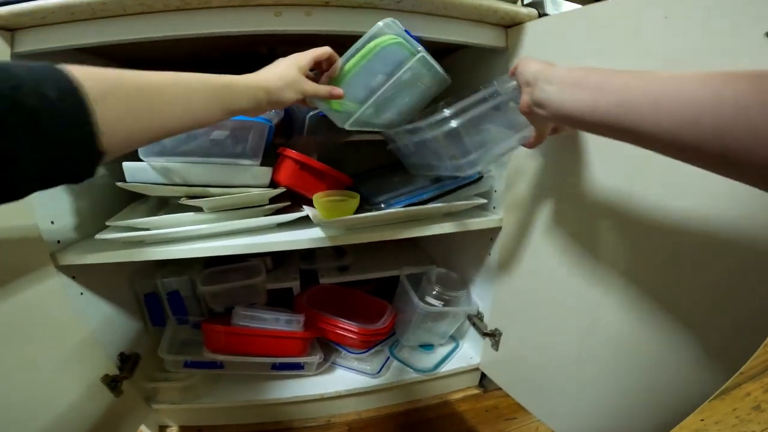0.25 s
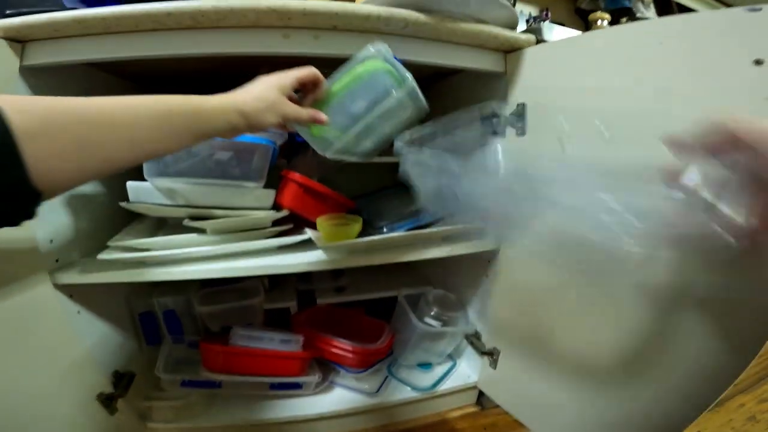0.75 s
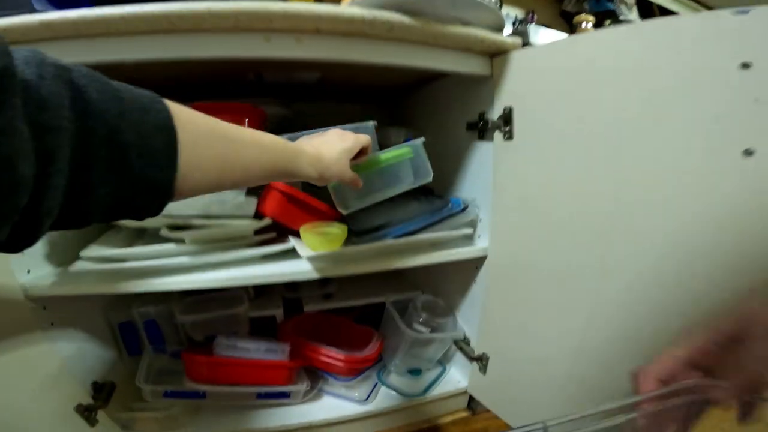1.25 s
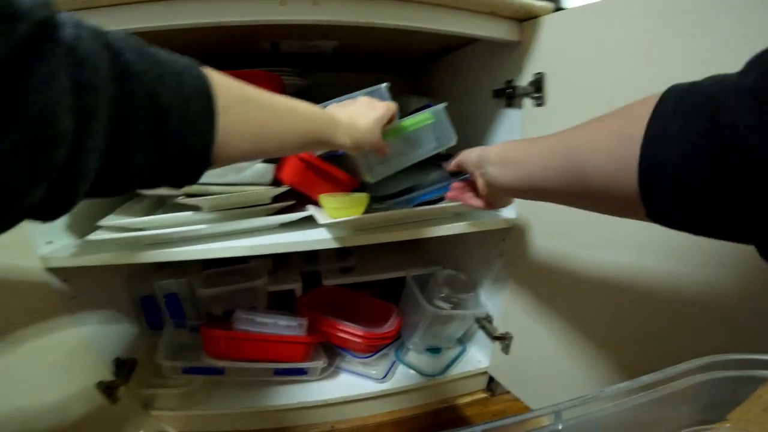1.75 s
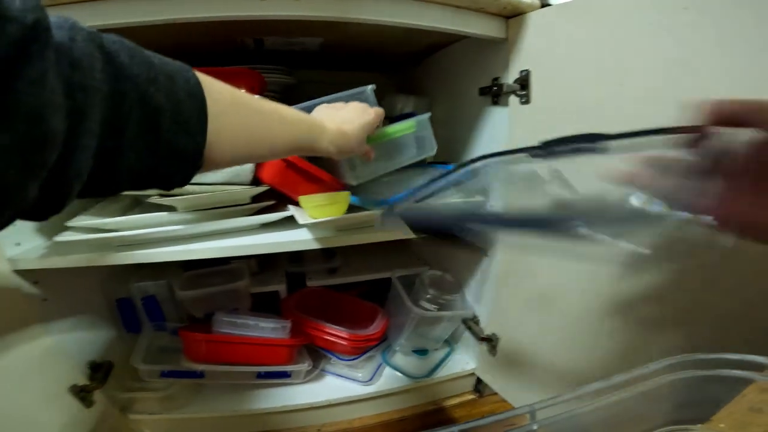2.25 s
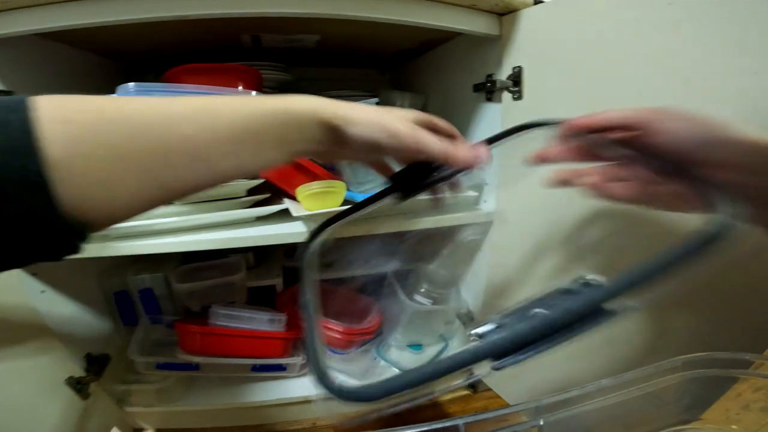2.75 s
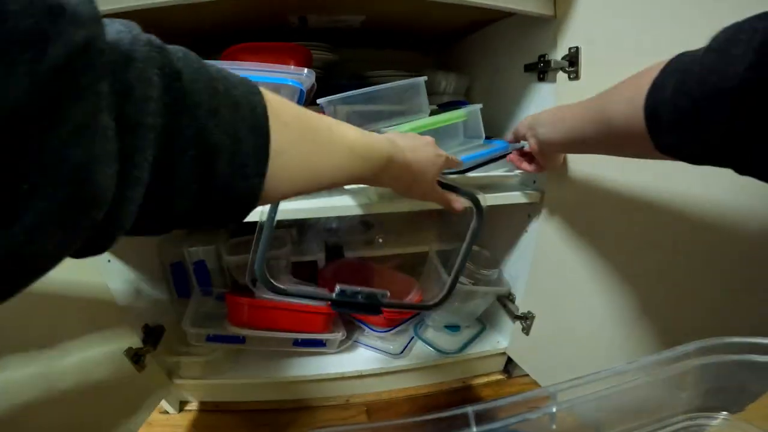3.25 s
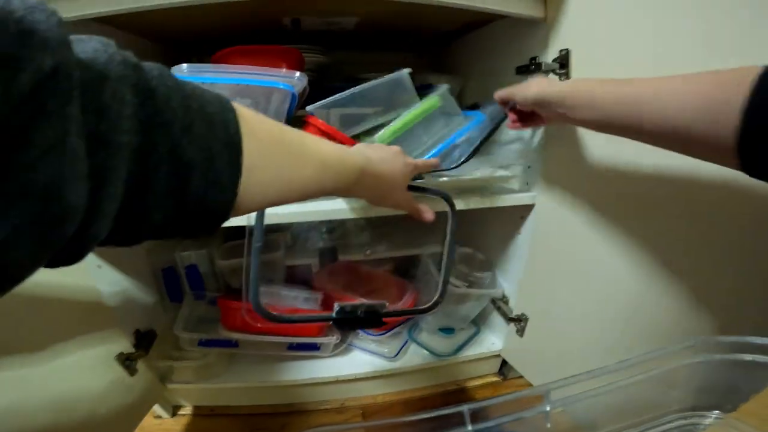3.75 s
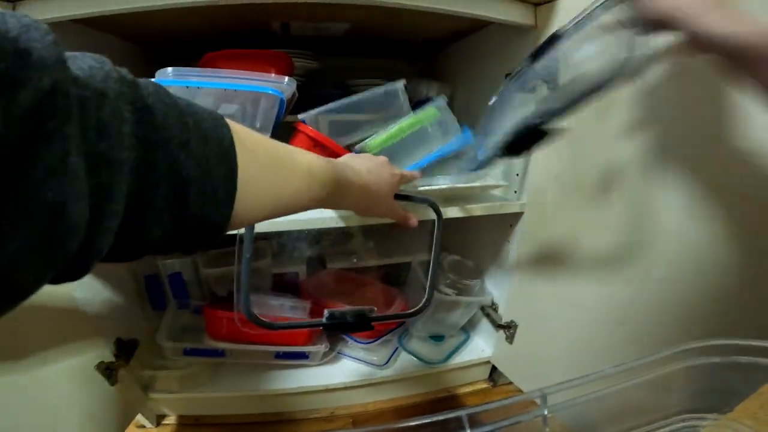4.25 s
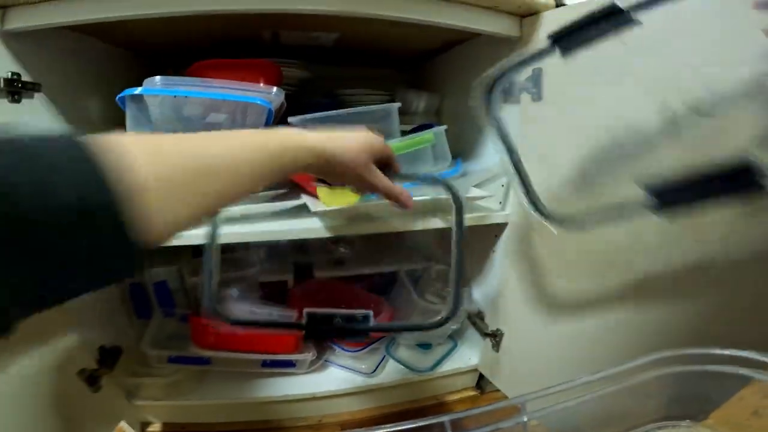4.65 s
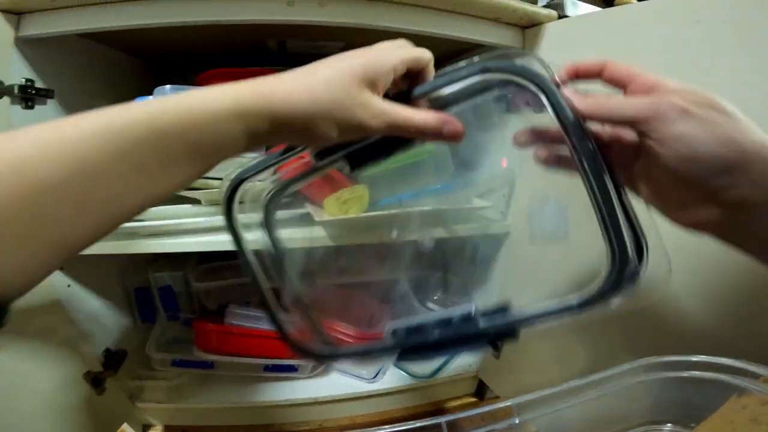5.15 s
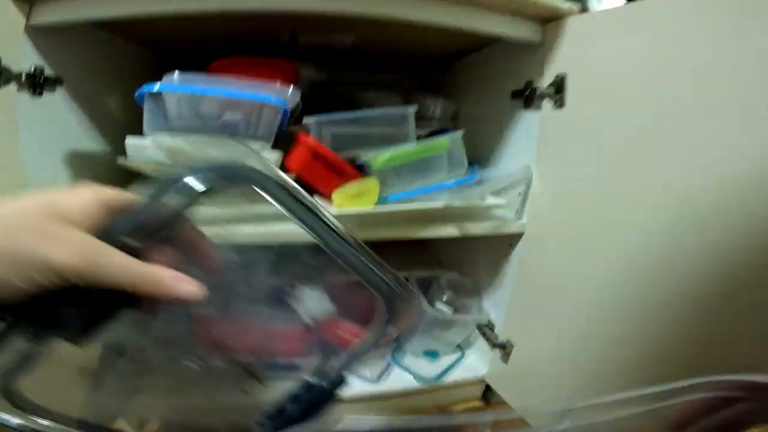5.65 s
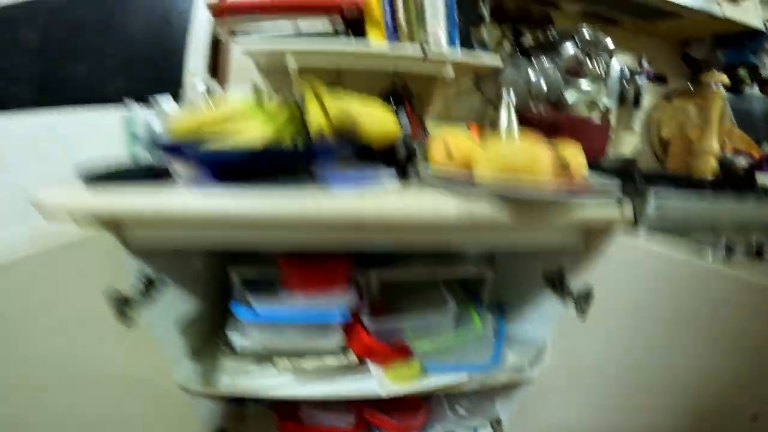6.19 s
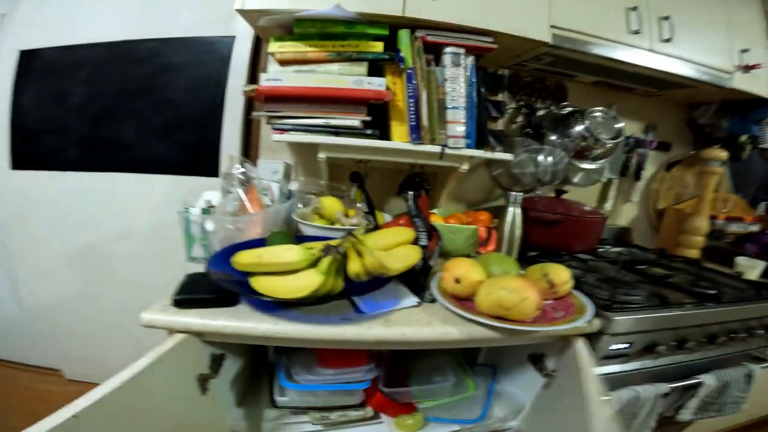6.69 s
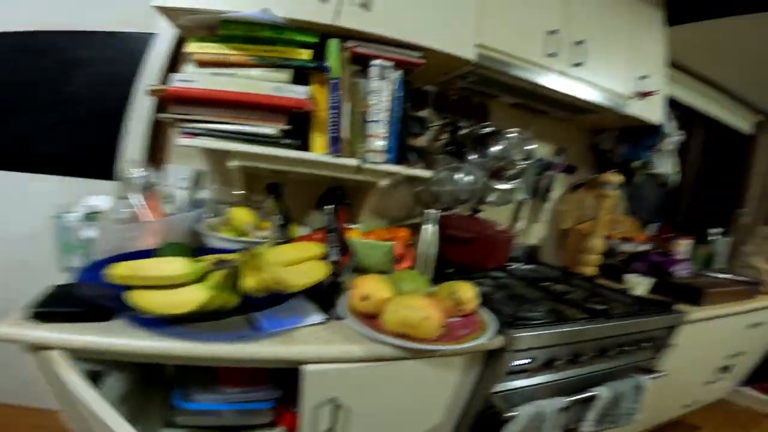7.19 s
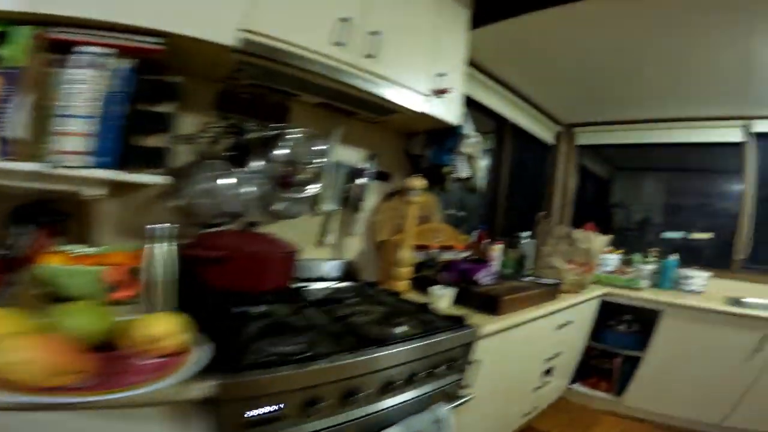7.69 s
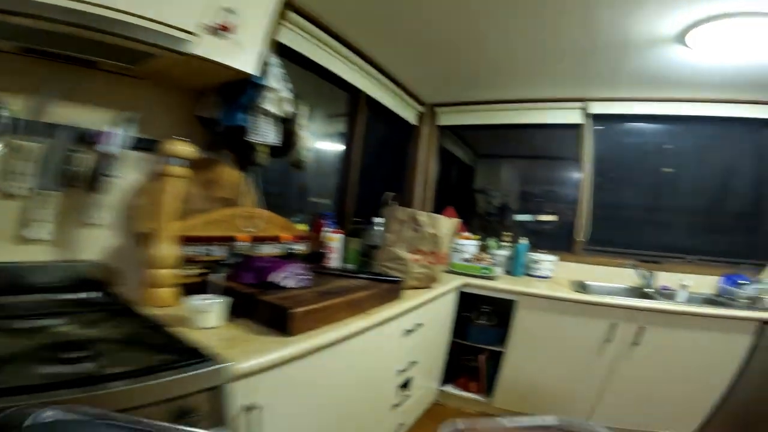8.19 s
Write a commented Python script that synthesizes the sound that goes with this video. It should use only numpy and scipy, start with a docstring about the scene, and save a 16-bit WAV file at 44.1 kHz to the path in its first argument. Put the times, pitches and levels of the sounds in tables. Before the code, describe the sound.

Plastic containers bump and slide against one another in a cupboard, dry and very near, with hollow mid-low notes and occasional bright clicks. Rigid lids catch as they are pulled out, then clack in the hand. A quieter moment of cloth movement follows before several woody door bangs with a short kitchen echo. Faint low room noise and microphone-handling bumps continue throughout.

```python
"""Close to a hand-carried stereo microphone, two people dig through a cupboard of plastic food containers.
From the start, in still kitchen air, tubs knock (noise snaps and rattles through resonances) and slide
(slips and hiss) on a booming shelf; the hand rumbles. Then two stiff lids catch on the way out and clack
together, cloth brushes as the two step back, and the cupboard doors bang shut and fill the small room.
Every touch has a level, a weight (how much it shakes the shelf) and a hardness (how bright it is)."""
import sys
import numpy as np
from scipy import signal
from scipy.fft import rfft, irfft, next_fast_len
from scipy.io import wavfile
from scipy.ndimage import uniform_filter1d

SR = 44100
rng = np.random.default_rng(int(sys.argv[2]) if len(sys.argv) > 2 else 0)


def log_audio(samples):
    """Write samples as a 16-bit WAV file to the path given in sys.argv[1]."""
    # one column per channel
    frames = np.atleast_2d(samples).T
    # limit to full scale, then quantise
    limited = np.clip(frames, -1, 1)
    pcm = np.round(limited * 32767).astype(np.int16)
    wavfile.write(sys.argv[1], SR, pcm)


N = 371763

# Edges of five zones, thud, knock, clack, tick and sparkle: edge_hz
ZONE_EDGES_HZ = [48, 180, 650, 2200, 6000, 15000]
# Steady room noise of the kitchen, relative colour: pitch_hz, level_db (per Hz)
AIR_COLOUR = [(15, -24.5), (25, -8), (58, 5), (133, -3.5), (239, -2), (464, -18.5), (831, -36),
              (1240, -29.5), (2340, -40), (7140, -46), (8600, -50.5), (10600, -50), (12800, -57),
              (14200, -70.5)]
AIR_DB = -42
# Steady tremor of the hand with the microphone, stronger once it walks: time_s, rumble_db
HAND_TREMOR = [(0, -48), (5.6, -52), (6.1, -46), (8.43, -46.5)]
# Jolts to that hand: start_s, length_s, rumble_db
HAND_JOLTS = [(1.075, 0.024, -22.5), (1.272, 0.044, -16), (2.9, .02, -23), (5.154, 0.027, -22),
              (5.443, 0.023, -16), (5.687, .02, -18.5), (5.98, 0.24, -38.5), (6.854, 0.049, -31.5),
              (7.27, .02, -21), (7.45, .02, -35), (7.76, .03, -31.5), (7.997, .15, -38)]
JOLT_RISE_S, JOLT_FALL_S = 0.065, 0.22   # time to swell and to die by 60 dB
# Tubs bumping each other and the shelf: start_s, level_db, weight_db, hardness_db,
# looseness (factor on the length, held to 0.3-3), ring_pitch_hz, hollow_pitch_hz
TUB_BUMPS = [(0.001, -19.5, -25, 1, 0.16, 700, 350), (0.095, -17.5, -22, 2.5, 1, 1010, 350),
             (0.13, -23.5, 6, 11.5, 1, 910, 342), (0.18, -38.5, 24.5, -2, .5, 956, 318),
             (0.234, -22, 12, -13, 0.92, 640, 303), (0.435, -33, -13, -6, 0.82, 1010, 471),
             (0.515, -25, -16, 2, 1, 1010, 312), (0.541, -16, -13, 8.5, 0.28, 764, 417),
             (0.599, -19.5, -8, 6.5, 0.66, 880, 460), (0.615, -21, -29, -1, .35, 1020, 358),
             (0.684, -23.5, -17, -19, .8, 930, 372), (0.719, -19.5, -15, -4.5, .35, 1000, 366),
             (0.764, -30.5, -13, 0.5, 0.83, 1220, 357), (0.863, -29.5, 5.5, 2, 0.73, 1030, 237),
             (0.893, -24, -1, -21, 0.34, 1010, 347), (0.978, -28, -1, 7, 0.43, 1080, 477),
             (1.057, -32, -5, 6.5, 0.5, 705, 328), (1.202, -14, -12.5, -9.5, 0.94, 660, 336),
             (1.26, -15, -6, -3, 0.19, 1220, 354), (1.359, -19, -15, 8.5, 1, 640, 415),
             (1.376, -11, -14, -4, 0.34, 673, 360), (1.387, -16, -15, 3, 0.7, 660, 365),
             (1.408, -13.5, -17, 7, .5, 680, 300), (1.415, -12.5, -2, 7, 0.93, 1490, 375),
             (1.81, -29.5, -28, 1, 0.58, 790, 378), (2.027, -35.5, -18, 19, 1, 1590, 318),
             (2.363, -12, -12.5, 0.5, 1, 1370, 331), (2.432, -20.5, -10, 9.5, 1, 670, 460),
             (2.456, -16.5, -8, -0.5, 1, 730, 445), (2.485, -11, -8.5, 9, 1, 660, 585),
             (2.504, -13.5, -9, -2, .6, 680, 316), (2.538, -18, -12, -4, 0.39, 700, 337),
             (2.653, -16.5, -12, 5.5, 0.53, 910, 643), (2.666, -18.5, -5, 0, 0.96, 620, 322),
             (2.789, -28, -5, -0.5, .45, 730, 355), (3.214, -21, -11, 9, 0.52, 1720, 456),
             (3.262, -27, 0, 3, .8, 1080, 486), (3.275, -23, 3, 1.5, 0.34, 900, 218),
             (3.448, -29.5, -22, -13, 0.28, 640, 317), (3.501, -46, 6, 14, .5, 1440, 345),
             (3.6, -21, -10, -8.5, 0.27, 810, 326), (3.627, -24.5, 1, 9, .5, 1060, 270),
             (3.649, -12, -9.5, -3.5, 0.32, 1120, 296), (3.849, -16.5, -8, -5, 1, 740, 398),
             (4.18, -25.5, -14, 7.5, 0.86, 795, 252), (4.318, -33.5, -14, 16.5, 1, 1080, 320),
             (4.395, -18.5, -7, 12.5, 1, 800, 415), (4.432, -11.5, -1, 9, 1, 1330, 470),
             (4.477, -11.5, -29, -21, 0.85, 1110, 337), (4.615, -14, 0, 4, 0.64, 990, 437),
             (4.783, -28, -14, -19, 0.45, 805, 340)]
# Resonances of tubs and shelf: pitch_hz, width_hz, gain_db (over the plain contact)
TUB_RESONANCES = [(85.2, 17.7, 23.5), (125, 26, 6.5), (190, 38, 6), (267, 64, 9.5), (347.7, 25.3, 13.5),
                  (383.6, 16, 4), (478, 29, 12), (566, 14, 7.5), (746, 30, 5.5), (942, 43, 4.5),
                  (1060, 145, 7.5), (1302, 100, 6), (1550, 56, 3.5), (1728, 28, 5.5), (2490, 54, 5.5),
                  (3520, 26, 8), (4390, 39, 5), (4530, 42, -8)]
# Pushes and pulls of plastic over plastic: start_s, length_s, level_db, weight_db, hardness_db
PLASTIC_DRAGS = [(0.08, 0.16, -25, -8.5, -8), (0.298, 0.36, -29, -4.5, -5.5),
                 (0.888, 0.1, -27.5, -13, -6.5), (1.058, 0.23, -33.5, -12, 4.5),
                 (1.304, 0.15, -23.5, -19, -6), (1.518, .04, -39.5, -1, 4), (1.923, 0.051, -31.5, -5, 10.5),
                 (2.05, 0.055, -28, -17, 7), (2.387, 0.22, -25, -20, -3), (3.19, .08, -45.5, 10, 18),
                 (3.377, 0.064, -32, -2, -8), (3.702, 0.1, -27.5, -6.5, 1), (3.846, 0.094, -21.5, -4, 3),
                 (4.038, 0.068, -22.5, -5, 11), (4.2, 0.076, -25, 0, 1.5), (4.308, 0.062, -28, 0, 10),
                 (4.413, 0.055, -15.5, -4.5, -1), (4.676, 0.027, -36, 8, 12), (4.747, .03, -45, 8, 13.5)]
DRAG_RISE_S, DRAG_FALL_S = 0.24, 0.25   # time to swell and to die by 60 dB
SCRAPE_DB, HISS_DB = -8.5, -25.5   # rims and edges against the hollow rub, at zero hardness
# Faint shifting of the pile while hands are in it: start_s, length_s, level_db
PILE_SHIFTS = [(0, 1.4, -43.5), (1.874, 0.85, -38), (3.103, 1.4, -45.5)]
# A stiff lid catching on the pile and on the other lid as it is drawn out:
# start_s, level_db, weight_db, hardness_db, looseness (as above), ring_pitch_hz
LID_SNAGS = [(1.895, -36.5, 1, 9, 1.5, 2900), (2.007, -36.5, -6, 13, 0.4, 1095),
             (2.05, -24, -1.5, 2, 1.07, 1740), (2.105, -36, -3, -5, 1, 920),
             (2.168, -24.5, -1, 7.5, .5, 1180), (2.321, -49.5, -9, 26, 0.29, 3730),
             (2.727, -28.5, -2, -9, .45, 1650), (3.555, -30.5, 0, -10.5, 1.2, 1750),
             (3.84, -25.5, 11, -8, 0.89, 1280), (3.9, -17, 6.5, 1, 0.56, 2480),
             (4.012, -25.5, -4, 10, 0.36, 1210), (4.017, -24, 8.5, 10, 0.26, 1700),
             (4.054, -26.5, 9, 10, 0.62, 1730), (4.065, -22.5, 4, 4, 0.35, 1720),
             (4.142, -30, -6, -8, 0.47, 1180), (4.522, -35, 8, 0.5, .7, 1750),
             (4.608, -27, 0.5, 1, .9, 1240), (4.621, -23.5, 4.5, 1.5, 0.82, 2470),
             (4.67, -23, 0, 0, 0.69, 1200), (4.997, -36, -9, -11, 0.64, 1170)]
# Resonances of the stiff lids: pitch_hz, width_hz, gain_db
LID_RESONANCES = [(80.1, 3.6, 29), (344, 35, 15), (443, 27, 10.2), (823, 32, 7.6), (1100, 44, 10.7),
                  (1387, 55, 8.8), (1724, 51, 12.4), (2110, 32, 3.5), (2505, 22, 12.2), (2920, 91, 8),
                  (3410, 49, 14), (3750, 56, 7), (4190, 54, 8), (4040, 54, 13), (4760, 120, 11.6),
                  (5270, 19, 10), (7120, 130, 11)]
# Lids and clips clacking in the hand, and a few light ticks of handling:
# start_s, level_db, weight_db, hardness_db, looseness (as above), ring_pitch_hz
HAND_CLACKS = [(2.874, -31, 6.5, 8.5, 1, 1040), (2.913, -25.5, 13.5, 7.5, 1, 4800),
               (2.926, -17.5, 5, -3, 1, 2210), (2.942, -23, -20, 8, 0.94, 4760),
               (2.967, -27.5, 9, -1, 1, 980), (2.982, -25, -8, 1, 0.68, 950),
               (3.098, -35.5, -4, 4.5, 0.9, 3060), (5.132, -36.5, 3, 16, .7, 1600),
               (5.136, -18.5, -0.5, 10, 0.47, 1533), (5.198, -30, 9.5, 3, 0.77, 1030),
               (5.219, -28.5, -11, 6, 0.81, 1010), (5.226, -36, 11.5, 7, 0.83, 1000),
               (5.303, -35.5, -3, -2, 0.71, 1030), (5.325, -43, -2, 12, .5, 1490),
               (5.33, -31, 0.5, 17, 0.4, 3100), (5.432, -21, 9, -2, 1, 1410), (5.446, -27, 0, 6, 0.7, 1560),
               (5.451, -16, 1, 4, 0.84, 1160), (5.483, -22.5, 1, -1.5, 0.67, 1510),
               (5.515, -31, 5, 4.5, 0.53, 1540), (5.545, -29.5, 1, -5, 1, 1130),
               (5.686, -22, 1, -7.5, 0.61, 950), (5.714, -29, -3, 0, 1, 1140),
               (5.749, -35, 5.5, 5, 1, 1140), (5.782, -28.5, 0, 2.5, 0.74, 1100),
               (5.808, -30.5, -2, -1, 1, 1150), (6.029, -39.5, 3, -5, .8, 1500),
               (6.092, -33, -2.5, -12.5, .9, 923), (6.569, -50, -3, 9.5, .6, 1120),
               (6.728, -40, 5, -6, 1, 1390), (8.298, -50.5, 14, -0.5, 1, 1060)]
# Resonances of lids and clips in the hand: pitch_hz, width_hz, gain_db
CLIP_RESONANCES = [(94.3, 13.2, 21.2), (219, 38, 3.6), (343, 180, 8.4), (471, 22, 6.4), (1057, 34, 11.4),
                   (1190, 170, 7.6), (1523, 140, 9.5), (1890, 61, 4.4), (2494, 300, 4.3), (3470, 45, 2.7),
                   (3650, 230, 7.2), (4990, 64, 5.8), (7700, 160, 6.7), (10830, 900, 2.7)]
# Sleeves and hands brushing as the two step back: start_s, length_s, swish_db, rustle_db
CLOTH_BRUSHES = [(5.163, 0.31, -46, -46.5), (5.76, 0.31, -29, -53), (6.197, 0.43, -47.5, -64),
                 (6.678, 0.14, -44, -61), (7.051, 0.12, -46, -69.5)]
BRUSH_RISE_S, BRUSH_FALL_S = 0.61, 0.89   # time to swell and to die by 60 dB
# Doors hitting the frame and bouncing:
# start_s, level_db, weight_db, hardness_db, looseness (as above), ring_pitch_hz
DOOR_HITS = [(7.167, -28, 12, 14, 0.51, 1870), (7.186, -29, -16, -6, 1.2, 890),
             (7.292, -13.5, 3, 7, 1, 1170), (7.397, -22, -4, 4, 1.1, 1240), (7.417, -26, -6, 2, 0.54, 1230),
             (7.629, -18, -0.5, -5.5, 1.01, 1200), (7.772, -42.5, -4, 15, 0.44, 1240),
             (7.989, -28.5, -2, -14.5, 1.17, 765), (8.128, -42.5, 8.5, -16, 0.65, 760)]
# Resonances of the cupboard doors: pitch_hz, width_hz, gain_db
DOOR_RESONANCES = [(77, 6.7, 23), (124, 27.3, 11.5), (177, 14, 7), (242, 23, 6), (307.4, 34, 13),
                   (478, 15, 10), (585, 15, 3.5), (745, 16, 8.5), (954, 28, 8), (1230, 73, 7.5),
                   (1473, 50, 7), (1980, 84, -3), (2330, 230, 4.5), (2690, 110, 5), (3230, 170, 3.5),
                   (3950, 290, 1.5), (4800, 120, 3.5)]
# Opposite part against the shared part of left and right, by zone: spread_db
ZONE_SPREAD_DB = [-43, -23.5, -9.5, -9, -10.5]
# Extra strength of a contact's first snap, least in the top zone: snap_db
SNAP_EXTRA_DB = [4, 0.5, 3.5, 2, -4]
# Share of a contact's hardness gained by each zone, growing upwards: share (factor)
ZONE_HARDNESS = [0.017, 0.029, 0.61, 1.025, 1.05]
SPOT_DB = 2.5   # every contact lands on another spot, so each resonance varies by this much
# Kitchen reverberation by zone, time to die by 60 dB: t60_s
KITCHEN_T60_S = [0.35, 0.24, 0.29, 0.3, 0.28]
LEFT_LAG_MS = 0.01   # close sounds reach the left microphone this much later than the right
# Left port, a little more hollow and sparkle and less tick: pitch_hz, width_hz, gain_db
LEFT_PORT_COLOUR = [(476, 210, 1.27), (2180, 1300, -1.5), (11500, 5000, 2.5)]
CUTOFF_HZ = 14400


def from_db(db):
    """Decibels to gain."""
    return 10 ** (np.asarray(db) / 20)


def rms_one(x):
    """Scale to an rms of one."""
    return x / np.sqrt(np.mean(x ** 2) + 1e-20)


def band(x, low_hz, high_hz):
    """Causal band-pass."""
    return signal.sosfilt(signal.butter(3, [low_hz, high_hz], "band", fs=SR, output="sos"), x)


def soften(x, corner_hz):
    """Yielding surfaces lose their top."""
    return signal.sosfilt(signal.butter(2, corner_hz, fs=SR, output="sos"), x)


def dying(t, t60):
    """Falls by 60 dB in t60 seconds."""
    return np.exp(-np.log(1000) * t / t60)


def body(x, modes):
    """A chain of resonant peaks (or dips), each ringing for as long as its width allows."""
    hz, width, db = np.transpose(modes)
    a = np.pi * width / SR
    c = -2 * np.cos(2 * np.pi * hz / SR)
    g = from_db(db)
    sos = np.stack([1 + a * g, c, 1 - a * g, 1 + a, c, 1 - a], axis=1) / (1 + a)[:, None]
    return signal.sosfilt(sos, x)


def widen(pair, spread_db):
    """Two unrelated signals become a shared part and an opposite part, spread_db against it."""
    shared, opposite = pair
    return shared + from_db(spread_db) * opposite * np.array([[1], [-1]])


def lumps(shape, size):
    """Random ups and downs about `size` samples long, spread 1."""
    noise = rng.standard_normal(shape)
    return rms_one(uniform_filter1d(uniform_filter1d(noise, size), size))


def steady(x, size):
    """Even out the chance swells of a narrow noise."""
    return x / np.sqrt(uniform_filter1d(np.mean(x ** 2, axis=0), size) + 1e-12)


def swells(start_s, length_s, level_db, rise_s, fall_s):
    """Gain of a series of movements: each swells ahead of its start, holds and dies away."""
    t = np.arange(0, N, 32) / SR
    power = 0
    for start, length, db in zip(start_s, length_s, level_db):
        rise = dying(np.maximum(start - t, 0), rise_s)
        fall = dying(np.maximum(t - start - length, 0), fall_s)
        power = power + (from_db(db) * rise * fall) ** 2
    return np.interp(np.arange(N) / SR, t, np.sqrt(power))


def air():
    """Steady room noise, alike on both sides in the bass and unlike in the treble."""
    hz = np.maximum(np.fft.rfftfreq(N, 1 / SR), 1)
    point_hz, point_db = np.transpose(AIR_COLOUR)
    colour = from_db(np.interp(np.log(hz), np.log(point_hz), point_db))
    spread_db = np.interp(np.log(hz), np.log([200, 4000]), [-20, -3])
    spectrum = widen(rfft(rng.standard_normal((2, N))), spread_db) * colour
    return from_db(AIR_DB) * rms_one(irfft(spectrum, N))


def jostle():
    """Deep rumble from the hand that carries the microphone: a tremor and single jolts."""
    tremor = from_db(np.interp(np.arange(N) / SR, *np.transpose(HAND_TREMOR)))
    rumble = np.hypot(tremor, swells(*np.transpose(HAND_JOLTS), JOLT_RISE_S, JOLT_FALL_S))
    noise = band(widen(rng.standard_normal((2, N)), spread_db=-20), 22, 58)
    return from_db(-2.5) * rumble * steady(noise, size=2600)


def snap_and_rattle(looseness, t, t60s, snap_db, uneven_db, tail_db, tail_t60):
    """Force by zone, contact and side: a snap and a dying scatter of tiny rattles."""
    count = len(looseness)
    contact = np.clip(looseness, .3, 3)[:, None, None]
    # loose parts chatter on after the first touch
    chatter = from_db(uneven_db * lumps((count, 1, len(t)), size=150) * np.minimum(t / 0.0097, 1))
    forces = []
    for t60, spread_db in zip(t60s, ZONE_SPREAD_DB):
        fade = (dying(t, t60 * contact) + from_db(tail_db) * dying(t, tail_t60)) * chatter
        fade = fade / np.linalg.norm(fade, axis=2, keepdims=True)
        scatter = rng.standard_normal((count, 2, len(t))) * fade
        forces.append([widen(pair, spread_db) for pair in scatter])
    forces = np.array(forces)
    forces[..., 0] += from_db(snap_db + np.array(SNAP_EXTRA_DB))[:, None, None]
    return forces


def blows(rows, modes, hollow_hz, t60s, snap_db, uneven_db, tail_db, tail_t60, soft_hz,
          hollow_db, ring_db, ring_q, colour_db, pan_db):
    """Each contact snaps and rattles, ringing through the object; positive pan_db leans left."""
    t = np.arange(int(SR * tail_t60)) / SR
    start_s, level_db, weight_db, hardness_db, looseness, ring_hz = np.transpose(rows)
    hollow_hz = np.broadcast_to(hollow_hz, len(rows))
    forces = snap_and_rattle(looseness, t, t60s, snap_db, uneven_db, tail_db, tail_t60)

    # the piece that is hit adds its own hollow note and its own ring to the common resonances
    spots_db = SPOT_DB * rng.standard_normal((len(rows), len(modes)))
    for i, spot in enumerate(spots_db):
        common = [(hz, width, db + extra) for (hz, width, db), extra in zip(modes, spot)]
        own = [(hollow_hz[i], 42, hollow_db), (ring_hz[i], ring_hz[i] / ring_q, ring_db)]
        forces[:, i] = body(forces[:, i], common + own)

    # the object sets the colour; hardness lifts the upper zones and weight lifts the thud
    zone_db = [level_db + db + share * hardness_db for db, share in zip(colour_db, ZONE_HARDNESS)]
    zone_db[0] = zone_db[0] + weight_db
    attack = int(.025 * SR)   # each zone takes its level over the first 25 ms
    sounds = 0
    for k, force in enumerate(forces):
        part = band(soften(force, soft_hz), ZONE_EDGES_HZ[k], ZONE_EDGES_HZ[k + 1])
        strength = np.sqrt(np.mean(part[:, :, :attack] ** 2, axis=(1, 2)))
        sounds = sounds + part * (from_db(zone_db[k]) / strength)[:, None, None]

    out = np.zeros((2, N + len(t)))
    for s, sound in zip(start_s, sounds):
        start = int(s * SR)
        out[:, start:start + len(t)] += sound
    return out[:, :N] * from_db([[pan_db / 2], [-pan_db / 2]])


def tubs():
    """Hollow tubs bump each other and the shelf, each with its own hollow note and ring."""
    bumps = np.array(TUB_BUMPS)
    return blows(bumps[:, :-1], TUB_RESONANCES, hollow_hz=bumps[:, -1],
                 t60s=[0.16, 0.093, 0.14, 0.11, 0.08], snap_db=-10.5, uneven_db=2.0,
                 tail_db=-16.0, tail_t60=.24, soft_hz=5000, hollow_db=10, ring_db=10.0, ring_q=11,
                 colour_db=[-3.5, -2.5, -13.5, -26.0, -36.5], pan_db=-0.24)


def friction(per_s, uneven_db, smooth_db, spread_db):
    """Tiny slips of uneven size over a smooth hiss."""
    sizes = from_db(uneven_db * np.minimum(rng.exponential(1, N), 4))
    slips = (rng.random(N) < per_s / SR) * sizes * rng.standard_normal((2, N))
    hiss = from_db(smooth_db) * rng.standard_normal((2, N))
    return widen(rms_one(slips) + hiss, spread_db)


def squeaks(low_hz, high_hz, width_hz, patchy_db, count):
    """As the point of contact wanders, one wall resonance after another sings up for a moment."""
    out = 0
    r = np.exp(-np.pi * width_hz / SR)
    for hz in np.geomspace(low_hz, high_hz, count):
        poles = [1, -2 * r * np.cos(2 * np.pi * hz / SR), r * r]
        tone = signal.lfilter([1, 0, -1], poles, rng.standard_normal(N))
        patches = from_db(patchy_db * np.clip(lumps(N, size=1200), -2, 2))
        out = out + tone * patches * low_hz / hz
    return rms_one(out)


def drag_gain(extra_db):
    """Gain of the drags, with extra_db for each, joined by the faint shifting of the pile."""
    start_s, length_s, level_db, _, _ = np.transpose(PLASTIC_DRAGS)
    shifting = swells(*np.transpose(PILE_SHIFTS), DRAG_RISE_S, DRAG_FALL_S)
    return np.hypot(shifting, swells(start_s, length_s, level_db + extra_db, DRAG_RISE_S, DRAG_FALL_S))


def sliding():
    """Dragging makes the shelf boom, the hollow tubs drone and their rims scrape."""
    _, _, _, weight_db, hardness_db = np.transpose(PLASTIC_DRAGS)
    boom, rub = drag_gain(weight_db), drag_gain(0)
    scrape, hiss = drag_gain(0.43 * hardness_db), drag_gain(hardness_db)
    # the surfaces stick and slip some tens of times a second
    slip = rms_one(from_db(3.5 * np.clip(lumps(N, size=520), -2, 1.6)))
    low = body(friction(per_s=300, uneven_db=2, smooth_db=-4.5, spread_db=-37.0), TUB_RESONANCES)
    high = body(slip * friction(per_s=400, uneven_db=3.5, smooth_db=7, spread_db=-7), TUB_RESONANCES)

    shelf = from_db(-1.5) * steady(body(band(low, 64, 150), [(80.2, 8.7, 4.9)]), size=2600)
    drone = squeaks(335, 480.6, width_hz=11.0, patchy_db=6.5, count=4)
    walls = from_db(-7.0) * rms_one(band(low, 160, 620)) + from_db(-8.5) * drone
    singing = slip * squeaks(620, 1900, width_hz=52, patchy_db=17.5, count=12)
    rims = from_db(-5.0) * rms_one(band(high, 580, 2200)) + from_db(-8.5) * singing
    edges = rms_one(soften(band(high, 3300, 14000), corner_hz=4920))
    return boom * shelf + rub * walls + from_db(SCRAPE_DB) * scrape * rims + from_db(HISS_DB) * hiss * edges


def lid_catches():
    """Stiff lids catch on the pile and on each other, with narrower rings than the tubs."""
    return blows(LID_SNAGS, LID_RESONANCES, hollow_hz=357,
                 t60s=[0.14, 0.3, 0.11, 0.052, 0.093], snap_db=-11.5, uneven_db=3.5,
                 tail_db=-21.5, tail_t60=.3, soft_hz=6000, hollow_db=3.5, ring_db=11.5, ring_q=18,
                 colour_db=[-7.0, -3.5, -4.0, -14.5, -20.5], pan_db=-0.2)


def clacks():
    """Lids and clips clack in the hand: a strong snap and a short rattle."""
    return blows(HAND_CLACKS, CLIP_RESONANCES, hollow_hz=205,
                 t60s=[0.11, 0.11, 0.048, 0.064, 0.05], snap_db=-6.0, uneven_db=4.5,
                 tail_db=-27, tail_t60=.24, soft_hz=6500, hollow_db=4, ring_db=9, ring_q=13,
                 colour_db=[-4.5, -7.0, -9, -11, -22.5], pan_db=-0.7)


def sleeves():
    """Cloth swishes softly and rustles a little."""
    start_s, length_s, swish_db, rustle_db = np.transpose(CLOTH_BRUSHES)
    swish = swells(start_s, length_s, swish_db, BRUSH_RISE_S, BRUSH_FALL_S)
    rustle = swells(start_s, length_s, rustle_db, BRUSH_RISE_S, BRUSH_FALL_S)
    cloth = friction(per_s=660, uneven_db=-1.5, smooth_db=2.0, spread_db=-7.5)
    low = rms_one(soften(band(cloth, 120, 1800), corner_hz=418))
    high = rms_one(soften(band(cloth, 1000, 13000), corner_hz=5200))
    return from_db(-12) * swish * low + from_db(-3) * rustle * high


def doors():
    """Doors hit the frame and bounce: heavy in the thud, with a long tail."""
    return blows(DOOR_HITS, DOOR_RESONANCES, hollow_hz=340,
                 t60s=[0.24, 0.22, 0.11, 0.085, 0.29], snap_db=-10, uneven_db=2.5,
                 tail_db=-14.5, tail_t60=.42, soft_hz=4360, hollow_db=3.5, ring_db=1.5, ring_q=7.9,
                 colour_db=[0, -1.0, -4.5, -20.5, -30.5], pan_db=0.1)


def kitchen(x, first_echo_s):
    """Diffuse wall reflections, a dying noise in each zone, longest in the thud."""
    t = np.arange(SR * 2 // 3) / SR
    echo = 0
    for k, t60 in enumerate(KITCHEN_T60_S):
        noise = widen(rng.standard_normal((2, len(t))), ZONE_SPREAD_DB[k] - 16.5)
        echo = echo + band(noise, ZONE_EDGES_HZ[k], ZONE_EDGES_HZ[k + 1]) * dying(t, t60)
    echo = echo * np.clip(t / first_echo_s - 1, 0, 1)   # silent up to the first echo, then fades in
    return signal.fftconvolve(x, echo / np.linalg.norm(echo[0]), axes=1)[:, :N]


def from_the_right(x):
    """The cupboard lies a little to the right, so the left side hears it a moment later."""
    size = next_fast_len(N + 64)
    delay = np.exp(-2j * np.pi * np.fft.rfftfreq(size, 1 / SR) * LEFT_LAG_MS / 1000)
    return np.stack([irfft(rfft(x[0], size) * delay, size)[:N], x[1]])


def scene():
    """Tubs and lids sound close by; the doors fill the room."""
    near = tubs() + lid_catches() + clacks()
    bangs = doors()
    room = kitchen(from_db(-19) * near + from_db(-6.5) * bangs, first_echo_s=0.0058)
    return from_the_right(near + sliding()) + bangs + room + sleeves() + jostle() + air()


def record(dry):
    """The two microphone ports differ slightly and share top-octave dips; peaks round, the top is cut."""
    ports = np.stack([body(dry[0], LEFT_PORT_COLOUR), dry[1]])
    coloured = body(ports, [(8850, 3000, -7), (11240, 710, -3.0), (13860, 3600, -10.5)])
    rounded = 1.428 * np.tanh(coloured / 1.769)
    return signal.sosfilt(signal.ellip(10, .3, 90, CUTOFF_HZ, fs=SR, output="sos"), rounded)


dry = scene()
out = record(dry)
log_audio(out)
```